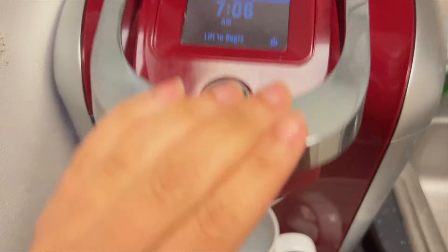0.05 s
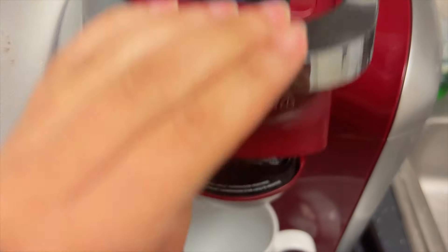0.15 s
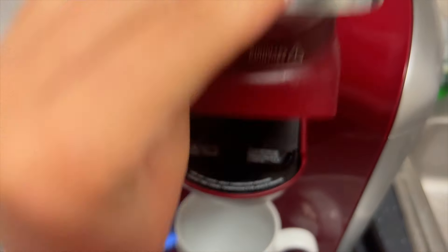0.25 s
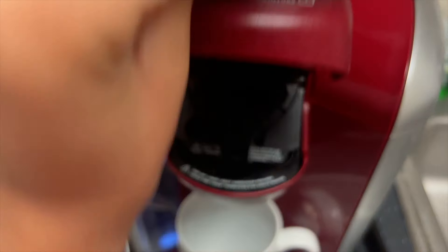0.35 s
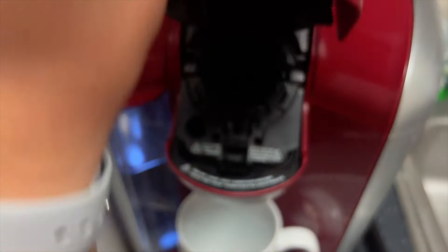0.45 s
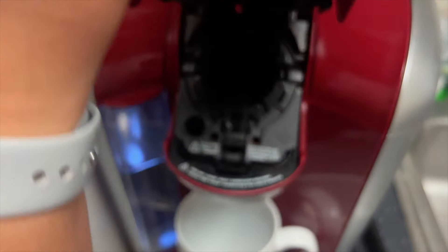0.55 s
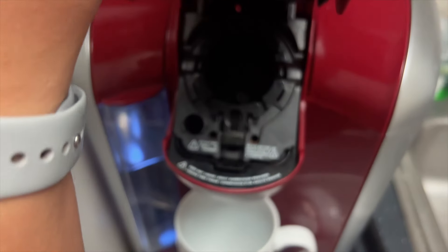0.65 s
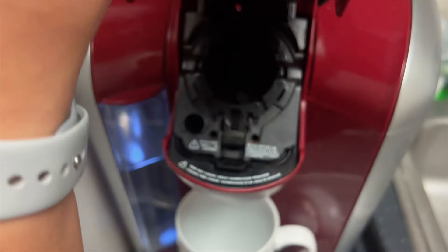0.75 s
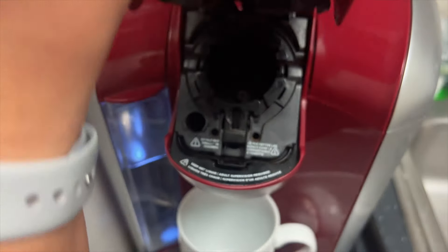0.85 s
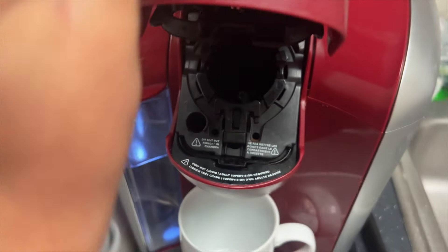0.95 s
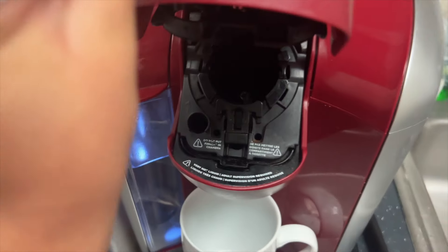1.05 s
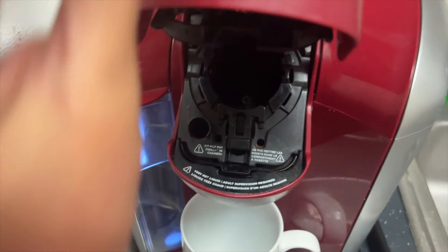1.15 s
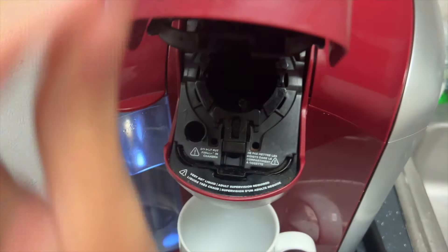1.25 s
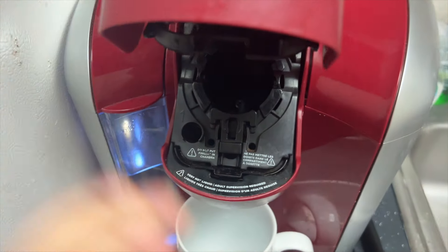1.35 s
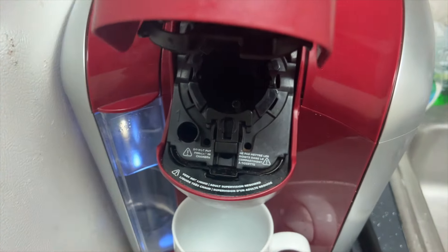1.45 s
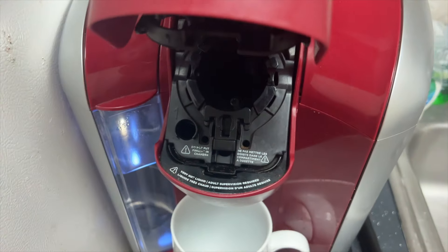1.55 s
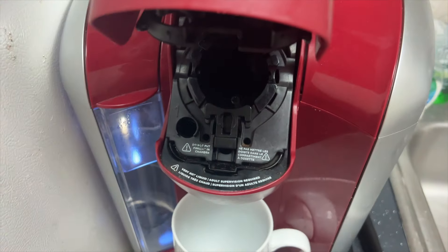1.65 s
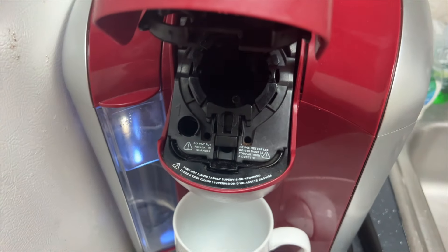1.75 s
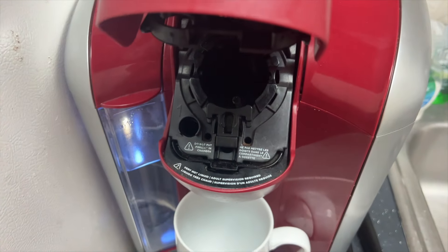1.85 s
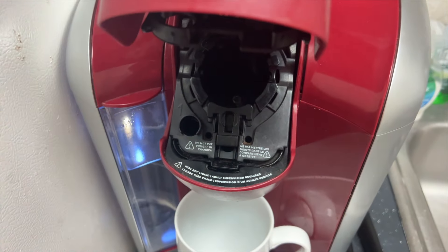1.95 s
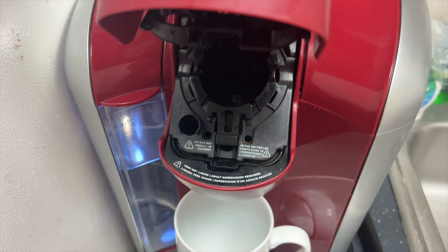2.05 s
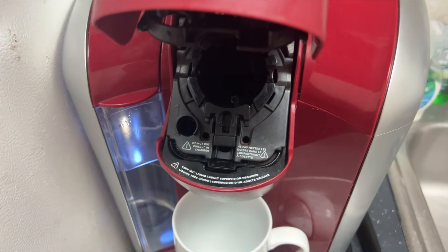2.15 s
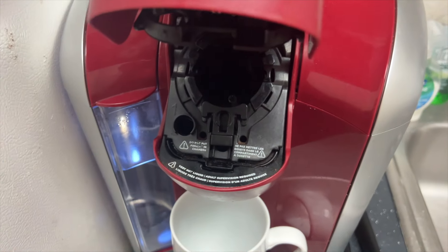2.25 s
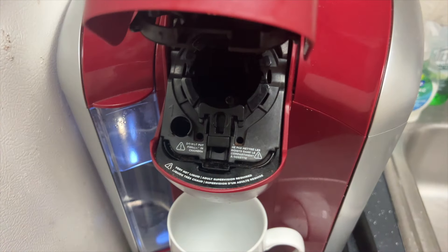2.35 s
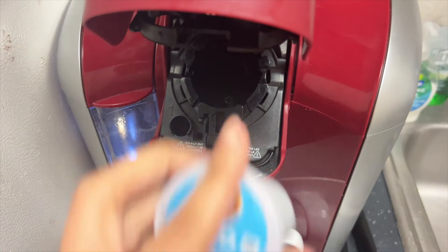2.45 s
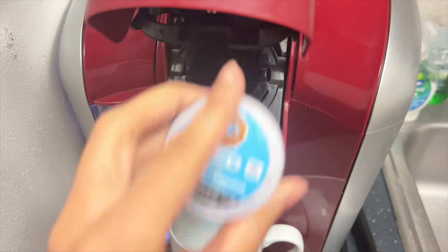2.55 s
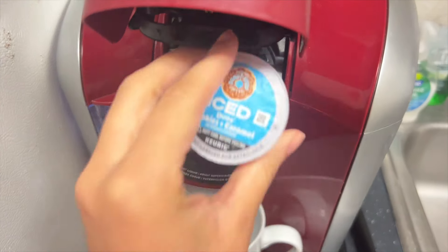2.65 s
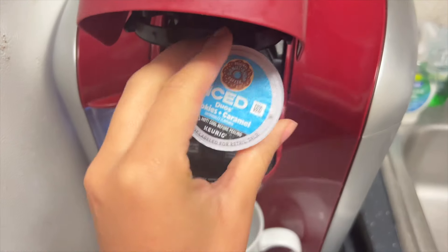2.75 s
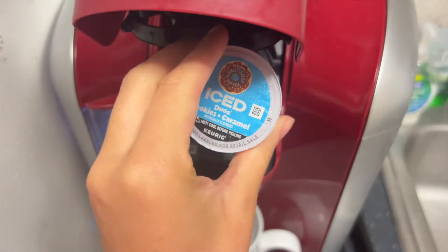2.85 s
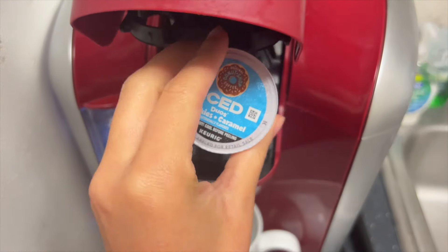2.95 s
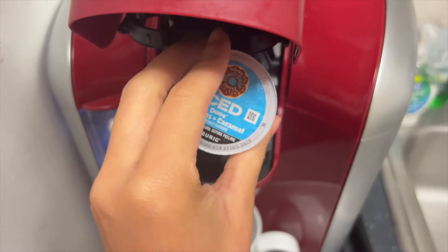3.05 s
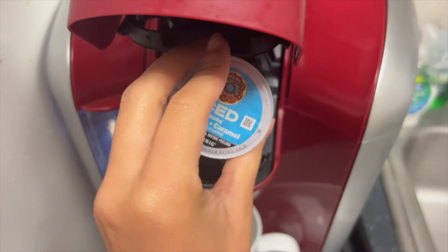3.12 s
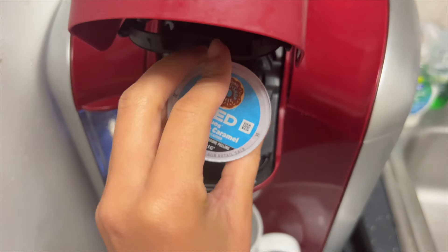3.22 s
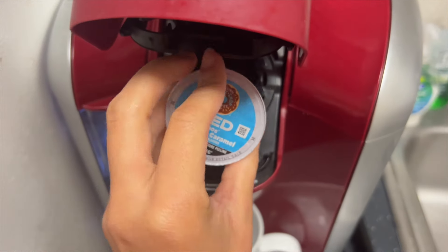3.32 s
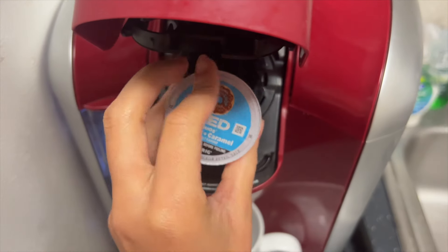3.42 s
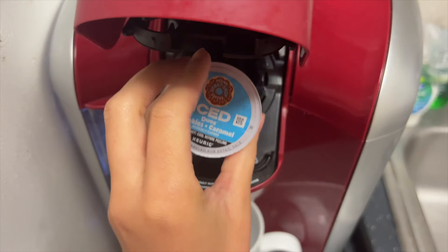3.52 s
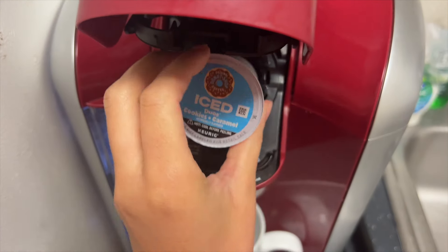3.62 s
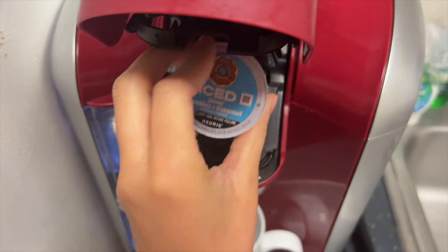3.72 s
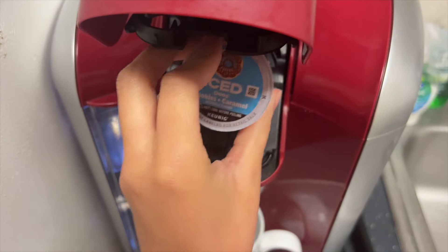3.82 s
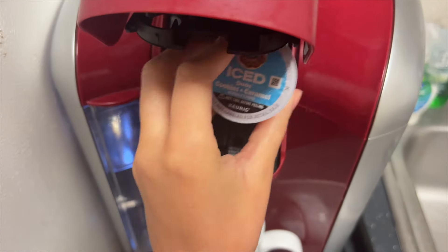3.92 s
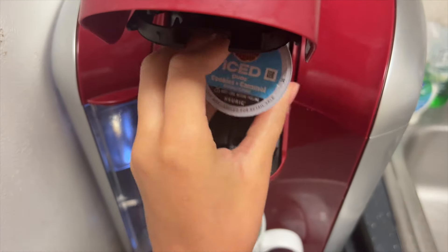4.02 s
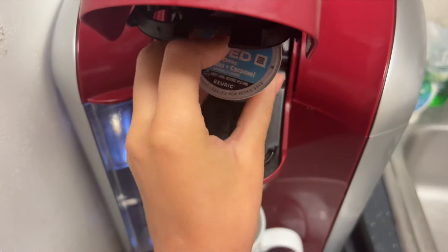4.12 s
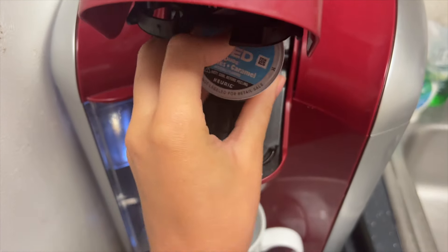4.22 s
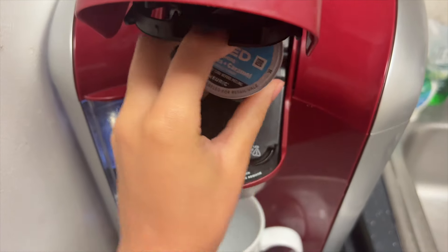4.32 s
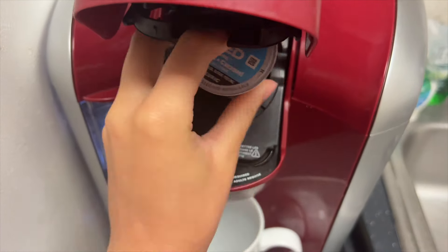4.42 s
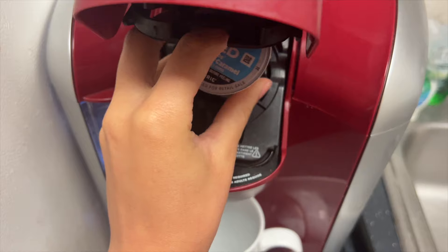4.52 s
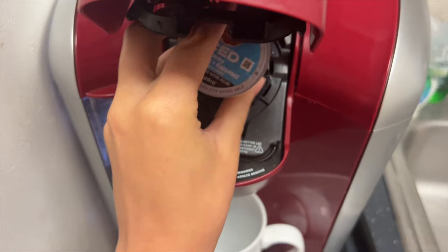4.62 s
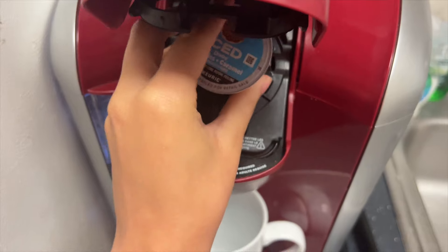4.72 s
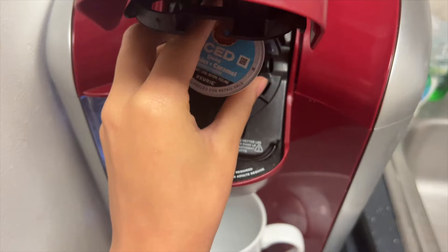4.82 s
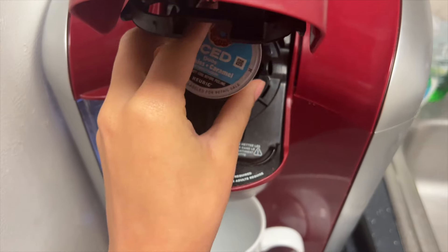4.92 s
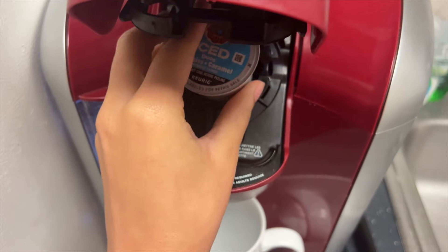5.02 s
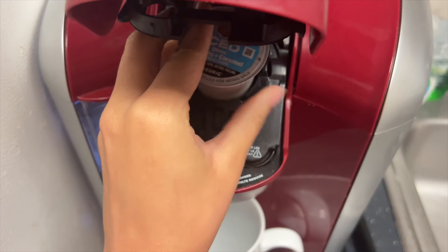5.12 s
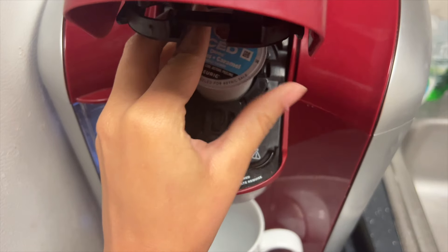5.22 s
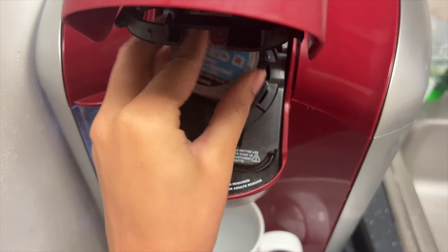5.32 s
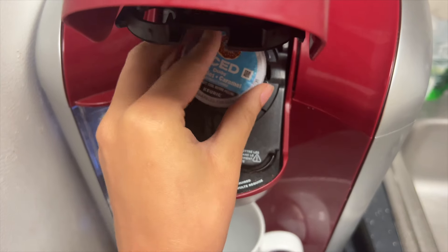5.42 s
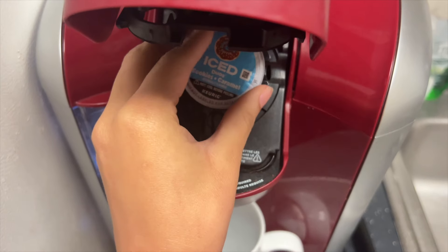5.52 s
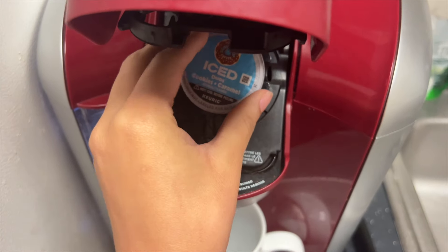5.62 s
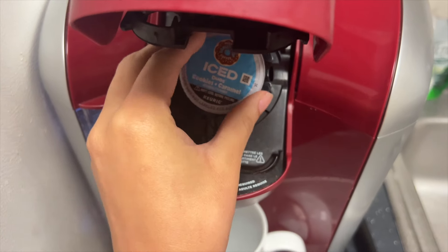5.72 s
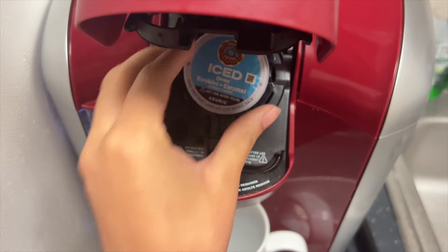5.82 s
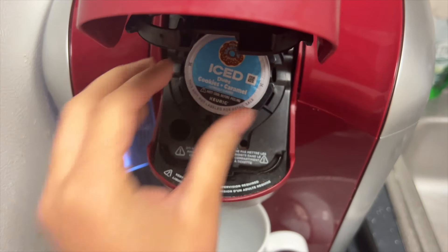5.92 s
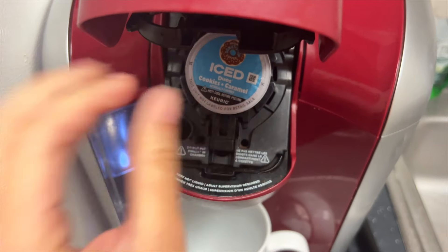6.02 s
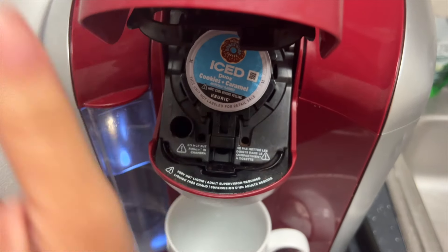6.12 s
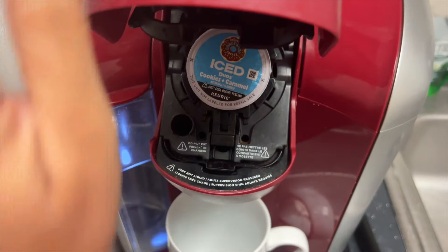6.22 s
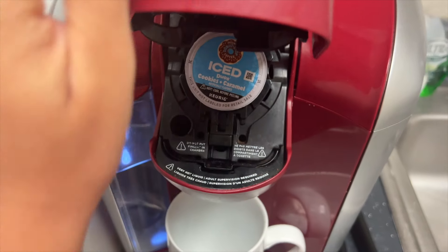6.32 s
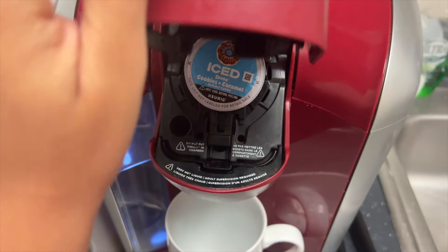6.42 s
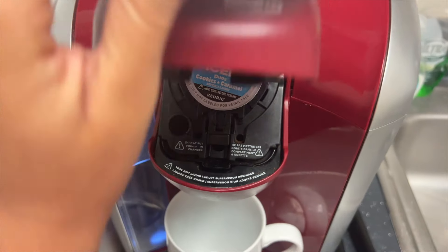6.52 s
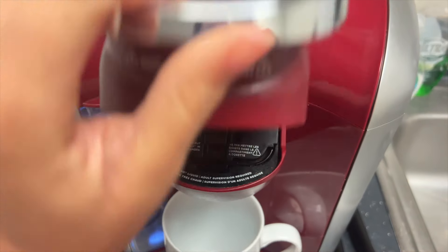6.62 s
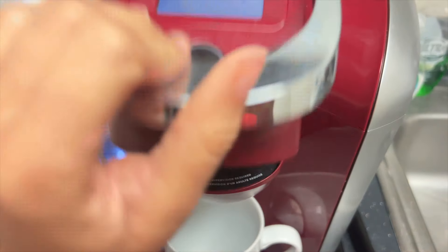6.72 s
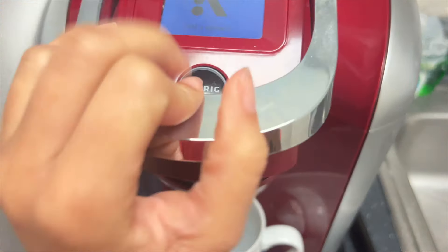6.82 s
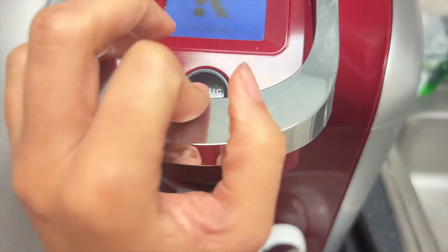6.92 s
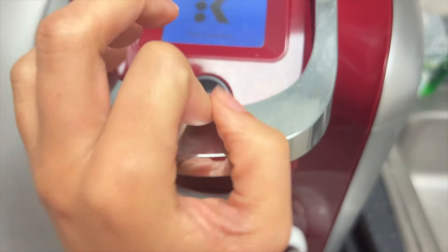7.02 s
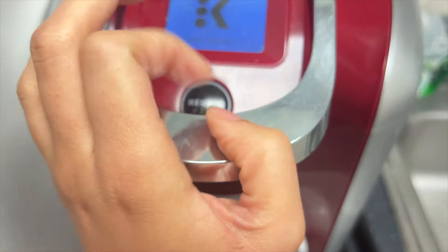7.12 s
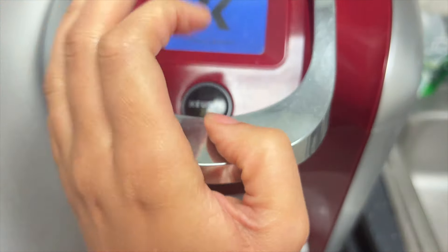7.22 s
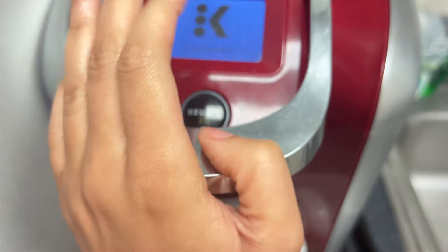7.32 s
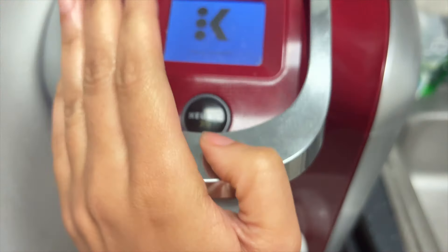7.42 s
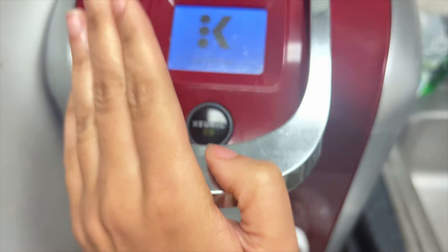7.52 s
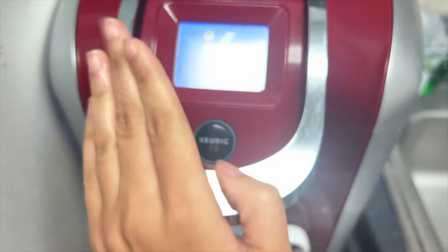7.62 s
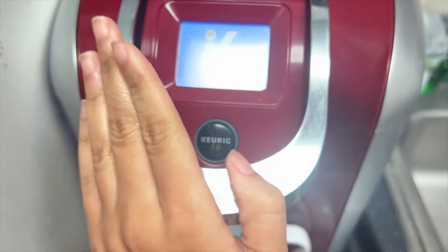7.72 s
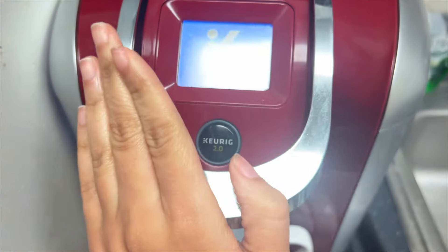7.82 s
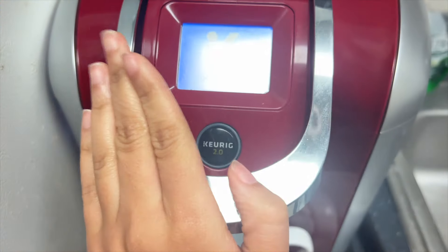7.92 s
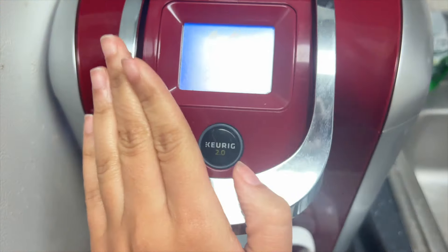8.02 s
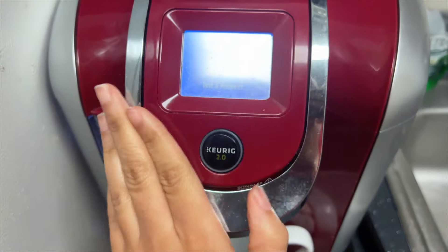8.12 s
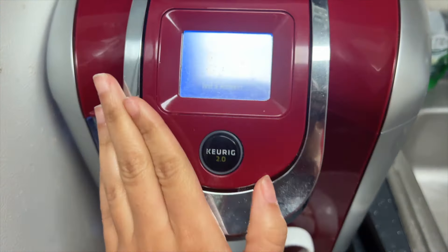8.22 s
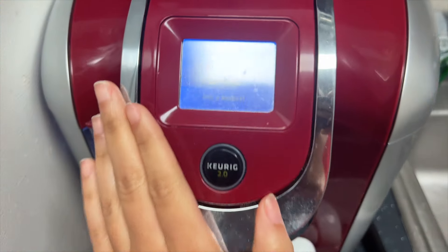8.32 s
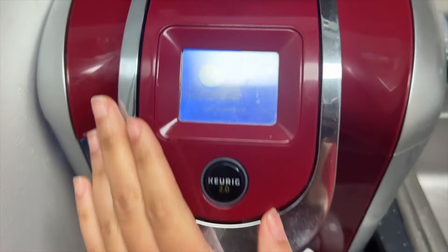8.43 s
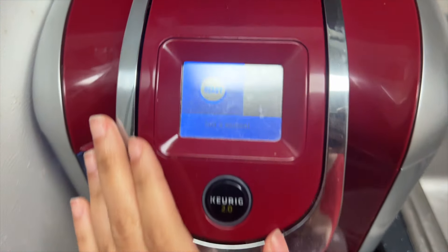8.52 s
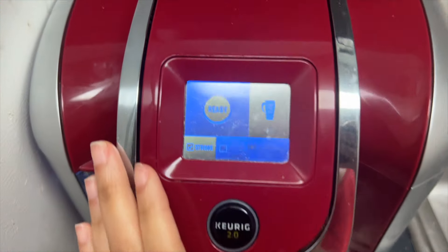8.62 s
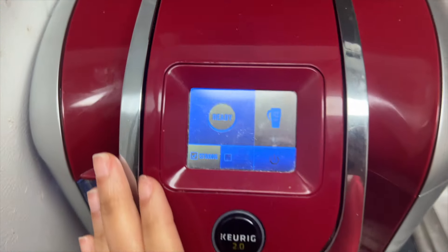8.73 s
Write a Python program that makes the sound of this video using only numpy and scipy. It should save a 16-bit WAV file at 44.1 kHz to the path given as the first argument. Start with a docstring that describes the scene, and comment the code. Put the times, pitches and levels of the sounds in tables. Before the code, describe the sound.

Quiet kitchen air with a faint low hum runs throughout, heard through close stereo microphones with short reflections. From 0 to 0.9 s a hand rubs and rumbles on a hollow plastic lid, with light knocks, a catch near 0.3 and a firmer knock near 0.9. Soft skin hiss follows around 1.2, then near silence. Tiny ticks come at about 2, a crackly foil brush at 2.35, and from 2.7 to 5.8 small dry pod taps, scrapes and clicks, strongest near 3.4, with a quick cluster around 5.3. At 6.55 the lid moves with a dull thump and rattling catches; a piercing bright click lands at 7.0. Scraping pressure builds from 7.4 into a sharp ping and heavy clunk at 7.55 to 7.6. The loudest latch, a thumping snap, hits at 8.03, followed by faint low bumps and grip murmur until the end.

```python
"""A quiet kitchen, a phone held close to a plastic pod coffee brewer, its two microphone ports giving stereo.
A hand lifts the lid, seats a pod and presses the lid shut. Noise contacts ring the modes of shell and pod holder,
small catches ping, sagging sine pulses thump, and shaped noise makes the rub, slide and swipe of the fingers.
Behind lie drifting room air with a low hum, first reflections off the counter and a short kitchen echo."""
import sys
import numpy as np
from scipy import signal
from scipy.fft import rfft, irfft, next_fast_len
from scipy.io import wavfile
from scipy.ndimage import uniform_filter1d

SR = 44100
rng = np.random.default_rng(int(sys.argv[2]) if len(sys.argv) > 2 else 0)


def int16_out(signal):
    """Quantize to a 16-bit WAV file."""
    q = np.round(np.clip(np.atleast_2d(signal).T, -1, 1) * 32767)
    wavfile.write(sys.argv[1], SR, q.astype(np.int16))


N = 386316

# spectrum of the kitchen air, before its overall level: pitch_hz, density_db [Hz, dB per Hz]
AIR_TONE = [(15, -27), (25, 13), (124, -2.5), (266, -8.5), (313, -12), (422, -21), (568, -21.5),
            (1830, -19.5), (2330, -28.5), (3060, -34), (3320, -32.5), (11900, -47.5), (16500, -54)]
# hum in the kitchen: pitch_hz, level_db [Hz, dB rms before it wavers]
HUM_TONES = [(119, -59.5)]
# likeness of left and right in the air: pitch_hz, likeness [Hz, 0 to 1]
AIR_LIKENESS = [(60, 0.62), (1400, 0.57), (15000, 0.073)]
# decay of the kitchen echo: pitch_hz, t60_s [Hz, s]
ECHO_DECAY = [(100, 0.65), (400, 0.43), (1500, 0.7), (5000, 0.54), (12000, 0.23)]
# colour of the kitchen echo: pitch_hz, gain_db [Hz, dB]
ECHO_COLOUR = [(600, 1), (1080, -0.5), (1600, 1.5), (3000, -0.6)]
# near sound at the ports, left over right: pitch_hz, difference_db [Hz, dB]
PORT_LEVEL = [(60, -0.5), (200, 4), (700, 7), (1300, 4.5), (2400, 2), (4400, 9.5), (8100, 3), (15000, -3)]
# near sound at the ports, how far left leads: pitch_hz, lead_rad [Hz, radians]
PORT_LEAD = [(60, .3), (600, .5), (900, -.9), (2000, -1.7), (2600, 1.6), (4300, .7), (7300, 1.5)]
# dull thumps through lid, counter and grip: start_s, peak_db, pitch_hz [s, dB, Hz where the sag ends]
THUMPS = [(6.563, -27, 230), (6.58, -14, 208), (6.59, -20, 106), (6.63, -25, 200), (8.0299, -3.5, 368),
          (8.042, -15.5, 126), (8.253, -34.5, 95), (8.36, -30, 138), (8.382, -45, 480), (8.421, -35, 191),
          (8.464, -25.5, 117.5), (8.518, -35.5, 96.3), (8.538, -39, 319), (8.543, -26.5, 110),
          (8.572, -34, 169), (8.584, -32, 80), (8.642, -28, 108.5), (8.667, -29, 78.2)]
# moves of the hand: start_s, swell_s, hold_s, hiss_db, rumble_db, scrape_db [s, s, s, dB, dB, dB]
HAND_MOVES = [(0.0, .001, 0.2, -57.5, -38.5, -44), (0.164, 0.14, 0.21, -53, -40, -44.5),
              (0.652, 0.011, 0.038, -73, -32, -41), (0.717, 0.087, 0.12, -58, -35, -46),
              (1.144, 0.12, 0.21, -55, -60, -61.5), (1.921, 0.12, 0.18, -59, -71, -74),
              (2.253, 0.13, 0.21, -61.5, -80, -77), (2.67, 0.016, 0.047, -60.5, -42.5, -51.5),
              (3.079, 0.022, 0.065, -59.5, -46.5, -46), (3.407, 0.023, 0.31, -59, -51, -55),
              (3.795, 0.078, 0.015, -55, -52, -51), (3.932, 0.17, 0.014, -55, -54, -61),
              (4.203, 0.013, 0.13, -56, -53.5, -55), (4.362, 0.036, 0.12, -56, -52, -46.5),
              (4.583, 0.066, 0.22, -63, -54, -101), (4.97, 0.079, 0.033, -63, -64, -83),
              (5.243, 0.019, 0.067, -53.5, -61, -67), (5.55, 0.052, 0.34, -64, -55.5, -66.5),
              (6.062, 0.1, 0.11, -58, -56.5, -66), (6.281, 0.1, 0.28, -61, -43.5, -52),
              (6.58, 0.14, 0.01, -52, -42, -35.5), (6.962, 0.021, 0.065, -53.5, -45, -44),
              (7.242, 0.037, 0.012, -67, -50.5, -53), (7.38, 0.035, 0.23, -56, -35.5, -37.5),
              (7.98, 0.058, 0.042, -42, -29, -30.5), (8.089, 0.047, 0.23, -100, -53.5, -75)]
# relative spectrum of sliding skin: pitch_hz, density_db [Hz, dB per Hz]
SKIN_TONE = [(530, -11), (900, 11), (1630, 13), (3830, 9.5), (8660, 7.5), (12600, -29.5), (13600, -16.5),
             (15500, -7.5), (16500, -28.5)]
# fingertips on the pod's foil top: start_s, length_s, level_db [s, s, dB]
FOIL_SWIPES = [(2.345, 0.15, -44.5), (3.266, 0.11, -52.5), (3.837, 0.086, -53.5)]
# small catches that ping on one short note: start_s, pitch_hz, level_db [s, Hz, dB]
CATCHES = [(0.282, 665, -27.5), (2.047, 2270, -38), (2.069, 4850, -41.5), (3.611, 560, -47.5),
           (3.625, 960, -51), (4.299, 940, -50), (4.416, 2800, -28.5), (4.479, 930, -49),
           (4.502, 953, -34.5), (4.662, 4870, -30), (6.68, 963, -27), (6.705, 1126, -34.5),
           (6.717, 1044, -31.5), (6.738, 980, -35), (6.765, 480, -42), (6.987, 8770, -8.5),
           (7.093, 1500, -41), (7.38, 547, -35), (7.437, 1790, -26.5), (7.541, 3280, -11),
           (7.913, 7670, -15), (8.015, 1916, -21), (8.0289, 1080, -12)]
# modes of the hollow shell: pitch_hz, relative_db, t60_s [Hz, dB, s]
SHELL_MODES = [(130, 14.5, 0.072), (222, 14.5, 0.094), (287, -1, 0.099), (403, -3, 0.008),
               (491, 10.5, 0.04), (577.4, 4, 0.036), (980, -7, 0.065), (1343, 6.5, 0.0072),
               (1507, -9, 0.048), (2023, -7, 0.012)]
# modes of the pod on its holder: pitch_hz, relative_db, t60_s [Hz, dB, s]
HOLDER_MODES = [(201.5, -3, 0.22), (303, 3, 0.08), (480, 9, 0.035), (620, 3, 0.03), (960, 4, 0.03),
                (1095, 5, 0.03), (1440, 3, 0.018), (1830, 2, 0.018), (2200, 0, 0.018)]
# relative spectrum of a bright snap: pitch_hz, density_db [Hz, dB per Hz]
SNAP_TONE = [(1060, -28), (1800, -4.5), (4340, -2.5), (5480, -0.5), (6290, -7), (8700, -3), (10300, -23),
             (11600, -18.5), (13700, -36), (15300, -13), (16500, -45.5)]
# Both blow tables give levels as if the energy were spent in 10 ms.
# pod picked up, then tapping and catching: start_s, knock_db, thud_db, tick_db, snap_db [s, dB, dB, dB, dB]
POD_BLOWS = [(1.943, -75, -71, -57, -55), (2.689, -47, -37, -54, -52), (2.742, -38.5, -49, -37.5, -52),
             (2.875, -50.5, -75, -56.5, -75), (3.132, -35.5, -35, -36, -46.5),
             (3.381, -64, -39, -26.5, -39), (3.391, -26, -23.5, -29.5, -32),
             (3.671, -37, -33.5, -43, -49.5), (3.997, -82, -49, -43.5, -46),
             (4.102, -39.5, -39.5, -38.5, -44), (4.206, -44, -47, -43.5, -72),
             (4.418, -33.5, -48, -35, -47.5), (4.505, -38.5, -31, -41.5, -43.5),
             (4.83, -40.5, -43, -48.5, -85), (5.107, -35, -34.5, -46.5, -57.5), (5.268, -32, -45, -31, -39),
             (5.273, -57, -39, -29.5, -36.5), (5.314, -37, -30, -35, -39), (5.33, -32, -33.5, -38, -42),
             (5.359, -28.5, -46, -40, -45.5), (5.387, -52, -41, -48, -52.5), (5.615, -42.5, -47, -57, -61),
             (5.739, -43.5, -47, -41.5, -50), (5.803, -44, -48, -51, -57)]
# lid, hinge and latch: start_s, knock_db, thud_db, tick_db, snap_db [s, dB, dB, dB, dB]
LID_BLOWS = [(0.138, -36.5, -43, -51, -57), (0.283, -31.5, -38, -33.5, -43), (0.447, -35, -31, -42.5, -73),
             (0.665, -36, -48, -38.5, -90), (0.825, -35.5, -44, -46, -78), (0.883, -25.5, -23, -44.5, -52),
             (6.384, -47, -50, -55, -49), (6.532, -35, -49, -61, -59), (6.582, -23.5, -11.5, -40, -52.5),
             (6.61, -50, -17.5, -35.5, -47.5), (6.682, -30, -30, -50, -47), (6.713, -38, -63, -46, -48),
             (6.754, -37.5, -47.5, -45, -38), (6.856, -52, -34.5, -42.5, -46),
             (6.969, -43, -49, -48, -37.5), (6.985, -24, -30, -30.5, -27), (7.026, -40.5, -46, -36.5, -40),
             (7.139, -39.5, -35, -55.5, -54), (7.25, -43, -33.5, -65, -63.5),
             (7.289, -45.5, -42.5, -55.5, -44.5), (7.396, -47, -33, -37.5, -32),
             (7.463, -32, -33.5, -37, -34.5), (7.487, -38, -33, -35, -34),
             (7.516, -30, -32.5, -33.5, -40.5), (7.542, -40, -37.5, -38.5, -32.5),
             (7.581, -18, -36, -22.5, -24.5), (7.591, -17, -29.5, -34.5, -31.5),
             (7.603, -13.5, -12.5, -36.5, -28), (7.913, -46, -35.5, -49, -38),
             (7.988, -37.5, -38, -34.5, -53.5), (8.029, -15.5, -18, -19.5, -23.5),
             (8.056, -17.5, -28, -22.5, -24.5)]

AIR_DB = -52.5
GRIP_START_S, GRIP_DB, GRIP_BAND_HZ = 8.06, -44, (45., 120.)
# in cycles of the settled pitch, except the start excess, a fraction of that pitch
THUMP_PEAK_CYCLES, THUMP_START_EXCESS, THUMP_SAG_CYCLES = 0.98, 0.85, 0.56
SWELL_FROM_DB = -16.5  # a move starts this far under its full level
HISS_FADE, RUMBLE_FADE, SCRAPE_FADE = 160, 162, 157  # dB per second after the hold
PING_T60_S = 0.06  # at 1000 Hz
PING_SPREAD_OCTAVES = (-0.3, 0.5)  # around a high note, narrower for low notes
PING_RISE_CYCLES = 0.5
SNAP_TILT_HZ = np.geomspace(2000, 9000, 5)  # each blow colours its snap at random across these
EDGE_HZ = 16600


def amp(db):
    """Decibels to gain."""
    return 10 ** (np.asarray(db) / 20)


def evened(x):
    """Scales to rms 1."""
    return x / np.sqrt(np.mean(x ** 2) + 1e-20)


def read(points, hz):
    """Reads a table on a log frequency axis."""
    f, value = np.transpose(list(points))
    return np.interp(np.log(hz + 1), np.log(f + 1), value)


def add(mix, start_s, sound):
    """Mixes a sound in at its start."""
    part = mix[round(start_s * SR):][:len(sound)]
    part += sound[:len(part)]


def coloured(x, points):
    """Filters x by the gains of a table."""
    return irfft(rfft(x) * amp(read(points, np.fft.rfftfreq(len(x), 1 / SR))), len(x))


def wandering(samples, shape=N):
    """Slow random drift of rms 1: noise averaged over a number of samples."""
    return evened(uniform_filter1d(rng.standard_normal(shape), size=samples))


def hush():
    """Steady kitchen air: noise in drifting patches, less alike left to right in the treble, and a wavering hum."""
    frames, hz = N // 256 + 5, np.fft.rfftfreq(1024, 1 / SR)
    a, b, c, d, patches = rng.standard_normal((frames, 513, 5)).T
    patches = uniform_filter1d(patches, size=10, axis=0)
    patches = evened(uniform_filter1d(patches, size=14, axis=1))
    same = np.clip(read(AIR_LIKENESS, hz), -1, 1)[:, None]
    left = a + 1j * b
    right = same * left + np.sqrt(1 - same ** 2) * (c + 1j * d)
    spectrum = np.array([left, right]) * amp(read(AIR_TONE, hz)[:, None] + 1.5 * patches)
    air = signal.istft(spectrum, nperseg=1024, noverlap=768)[1][:, :N]
    waver = amp(0.57 * wandering(6000))
    t = np.arange(N) / SR
    hum = sum(amp(db) * np.sqrt(2) * np.sin(2 * np.pi * f * t) for f, db in HUM_TONES) * waver
    return (amp(AIR_DB) * evened(air) + hum) * amp([[1.], [-1.]])  # a little stronger on the left


def kitchen(x):
    """Room echo: sparse taps of random sign, each band dying at its own speed."""
    taps = np.zeros((2, SR))
    at = np.arange(200, SR - 20, 20) + rng.integers(0, 20, (2, (SR - 201) // 20))
    np.put_along_axis(taps, at, rng.choice([-1., 1.], at.shape), 1)
    hz, t, z = signal.stft(taps, SR, nperseg=256)
    decay = amp(-60 * t / read(ECHO_DECAY, hz)[:, None])
    tail = signal.istft(z * decay, SR, nperseg=256)[1]
    return signal.fftconvolve(x[None], tail / np.linalg.norm(tail[0]), axes=1)[:, :N]


def counter(x):
    """A few first reflections off counter, cup and wall, different at each port."""
    taps = np.zeros((2, 700))
    at = rng.integers(40, 700, (2, 8))  # samples, about 1 to 16 ms
    np.put_along_axis(taps, at, rng.choice([-1., 1.], (2, 8)), 1)
    taps *= amp(-14.5) * np.exp(-np.arange(700) / 500)
    return signal.oaconvolve(x[None], taps, axes=1)[:, :N]


def ports(x):
    """The two microphone ports hear a near sound with their own level and phase at each frequency."""
    size = next_fast_len(N)
    hz = np.fft.rfftfreq(size, 1 / SR)
    half = amp(read(PORT_LEVEL, hz) / 2) * np.exp(0.5j * read(PORT_LEAD, hz))
    pair = np.array([half, 1 / half])
    pair = pair / abs(pair.mean(0)).clip(0.4)  # holds the level of the two ports' average
    return irfft(rfft(x, size) * pair, size)[:, :N]


def grip():
    """The grip on the phone shifts near the end and murmurs low: band-passed noise that fades in."""
    band = signal.butter(2, GRIP_BAND_HZ, "band", fs=SR, output="sos")
    murmur = evened(signal.sosfilt(band, rng.standard_normal(N)))
    return amp(GRIP_DB) * murmur * np.clip((np.arange(N) / SR - GRIP_START_S) * 20, 0, 1)


def thumps():
    """Each thump is about two cycles of low push that start high and sag in pitch."""
    out, t = np.zeros(N), np.arange(4000) / SR
    for start_s, db, hz in THUMPS:
        u = hz * t / THUMP_PEAK_CYCLES
        push = (u * np.exp(1 - u)) ** 2
        sag = 1 - np.exp(-hz * t / THUMP_SAG_CYCLES)
        turns = hz * t + THUMP_START_EXCESS * THUMP_SAG_CYCLES * sag
        add(out, start_s, amp(db) * push * np.sin(2 * np.pi * turns))
    return out


def follow(layer, fade_db_per_s):
    """Gain of hiss (0), rumble (1) or scrape (2) along time: the moves of the hand added up by power."""
    start, swell, hold, *levels_db = np.transpose(HAND_MOVES)[:, :, None]
    t = np.arange(0, N / SR, 1 / 500)
    rising = SWELL_FROM_DB * np.clip(1 - (t - start) / np.maximum(swell, 1e-3), 0, 1)
    fading = fade_db_per_s * np.maximum(t - start - swell - hold, 0)
    gain = np.linalg.norm(amp(levels_db[layer] + rising - fading) * (t >= start), axis=0)
    return np.interp(np.arange(N) / SR, t, gain)


def slide():
    """Friction hiss whose colour drifts in patches as the touch shifts, grainy where skin and plastic catch."""
    grain = amp(1.3 * wandering(200))
    hiss = coloured(rng.standard_normal(N), SKIN_TONE) * grain
    z = signal.stft(hiss, SR, nperseg=512)[2]
    patches = uniform_filter1d(rng.standard_normal(z.shape), size=7, axis=0)
    patches = evened(uniform_filter1d(patches, size=10, axis=1))
    hiss = signal.istft(z * amp(2.6 * patches), SR, nperseg=512)[1][:N]
    return follow(0, HISS_FADE) * evened(hiss)


def ring(drive, modes, lo, hi):
    """Drives the decaying modes of a body that lie from lo up to hi (Hz)."""
    t = np.arange(8192) / SR
    body = sum(amp(db - 60 * t / t60) * np.sin(2 * np.pi * hz * t) for hz, db, t60 in modes if lo <= hz < hi)
    return signal.oaconvolve(drive, body)[:len(drive)]


def drag():
    """Dense uneven slips shake the low and the upper modes of the plastic into rumble and scrape."""
    slips = rng.standard_normal((2, N))
    slips *= amp(2.0 * np.minimum(rng.exponential(1, (2, N)), 3))
    slips *= rng.random((2, N)) < 900 / SR  # on average 900 slips a second
    slips *= amp(2.8 * wandering(900, (2, N)))  # they come in clumps
    # the hand damps and dulls the modes
    held = [(hz, db - 3 * np.log2(hz / 400), 0.6 * t60) for hz, db, t60 in SHELL_MODES + HOLDER_MODES]
    low = evened(ring(slips[0], held, 0, 350))
    high = evened(ring(slips[1], held, 350, SR))
    return follow(1, RUMBLE_FADE) * low + follow(2, SCRAPE_FADE) * high


def swipes():
    """Fingertips on foil: short bright crackly hiss with a soft start and end."""
    out = np.zeros(N)
    for (start_s, length_s, db), noise in zip(FOIL_SWIPES, rng.standard_normal((len(FOIL_SWIPES), 8192))):
        size = min(round(length_s * SR), 8192)
        crackle = amp(3.2 * evened(uniform_filter1d(noise[::-1], size=120)))
        bright = np.diff(coloured(noise, SNAP_TONE), prepend=0) * crackle  # differencing lifts the treble
        add(out, start_s, amp(db) * evened(bright)[:size] * signal.windows.tukey(size, 0.7))
    return out


def pings():
    """A catch excites a cluster of stiff modes: those near the note linger, the outer ones die sooner."""
    out, t = np.zeros(N), np.arange(3000) / SR
    for (start_s, hz, db), (jitter, phase) in zip(CATCHES, rng.random((len(CATCHES), 2, 16, 1))):
        octaves = np.interp(np.arange(16)[:, None] + jitter, (0, 16), PING_SPREAD_OCTAVES)
        octaves = octaves * min(hz / 3500, 1)
        t60 = PING_T60_S / np.sqrt(hz / 1000) / np.sqrt(1 + (octaves / 0.12) ** 2)
        # the modes of a low note start nearly in step
        turns = hz * 2 ** octaves * t + min((hz / 2000) ** 2, 1) * phase
        cluster = (amp(-60 * t / t60) * np.sin(2 * np.pi * turns)).sum(0)
        onset = 1 - np.exp(-t * hz / PING_RISE_CYCLES)
        add(out, start_s, amp(db) * onset * cluster / 5)
    return out


def blows(table, modes, contact_s, rattle_db):
    """A short rough contact and a loose rattle ring low, middle and upper modes and snap in the air."""
    out, t = np.zeros(N), np.arange(8192) / SR
    contact = np.exp(-t / contact_s) + amp(rattle_db) * np.exp(-t / 0.013)
    contact *= 1 - np.exp(-t / 0.00046)  # the surfaces meet over about a millisecond
    grit = rng.standard_normal((len(table), 4, 8192))
    spots = rng.standard_normal((len(table), len(modes), 2))
    for (start_s, *levels_db), noise, spot in zip(table, grit, spots):
        # every spot shifts and weights the modes a little
        struck = [(hz * (1 + 0.03 * a), db + 3 * b, t60) for (hz, db, t60), (a, b) in zip(modes, spot)]
        knock = ring(noise[0] * contact, struck, 350, 800)
        thud = ring((2 + noise[1]) * contact, struck, 0, 350)  # more push than grit
        tick = ring(noise[2] * contact, struck, 800, SR)
        tilt = zip(SNAP_TILT_HZ, 3 * spot[:5, 1])
        snap = coloured(coloured(noise[3], SNAP_TONE), tilt) * contact
        for db, part in zip(levels_db, (knock, thud, tick, snap)):
            add(out, start_s, amp(db) * part * np.sqrt(441) / np.linalg.norm(part))  # 441 samples are 10 ms
    return out


def scene():
    """Everything the hand does, near and echoed, over the kitchen air."""
    pod = blows(POD_BLOWS, HOLDER_MODES, contact_s=0.0011, rattle_db=-10.0)
    lid = blows(LID_BLOWS, SHELL_MODES, contact_s=0.0015, rattle_db=-4.5)
    hand = drag() + slide() + swipes() + pings() + pod + lid
    # high-pass at 95 Hz keeps the bass out of the hand's sounds
    hand = signal.sosfilt(signal.butter(3, 95., "high", fs=SR, output="sos"), hand)
    # the paired gains are left and right, in dB
    echo = amp(-14.5) * kitchen(coloured(hand, ECHO_COLOUR)) * amp([[1.5], [-1.5]])
    reflections = counter(hand) * amp([[2.], [-2.]])
    low = (grip() + thumps()) * amp([[0.5], [-0.5]])
    return hush() + echo + reflections + low + ports(hand)


def record(dry):
    """Band limit of the recorder: a steep low-pass."""
    lowpass = signal.firwin(511, EDGE_HZ, window=("kaiser", 9), fs=SR)
    return signal.oaconvolve(dry, lowpass[None], "same")


dry = scene()
out = record(dry)
int16_out(out)
```